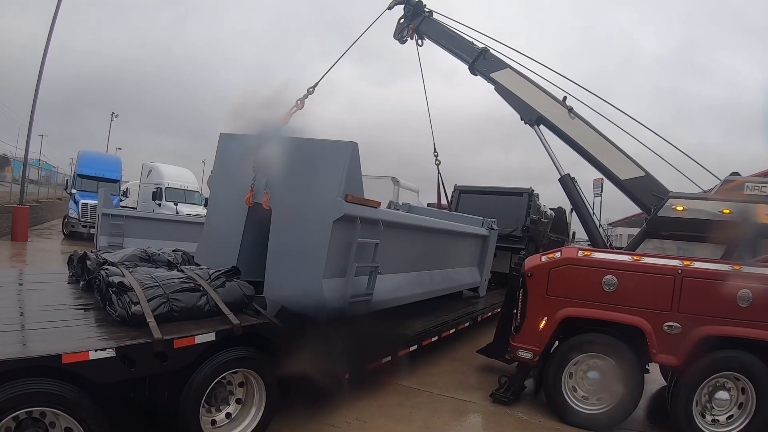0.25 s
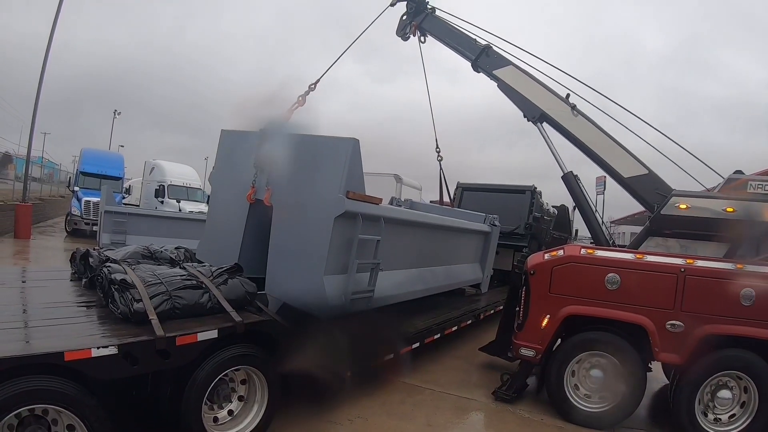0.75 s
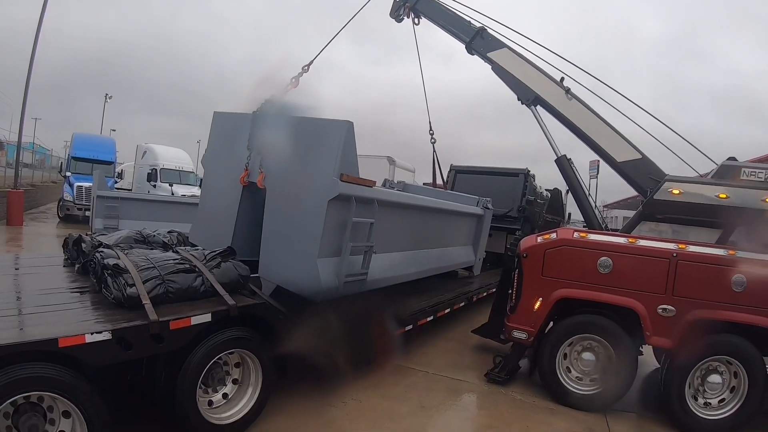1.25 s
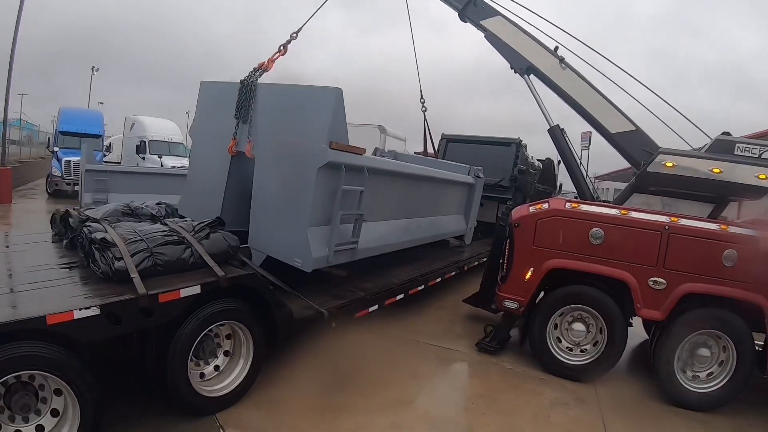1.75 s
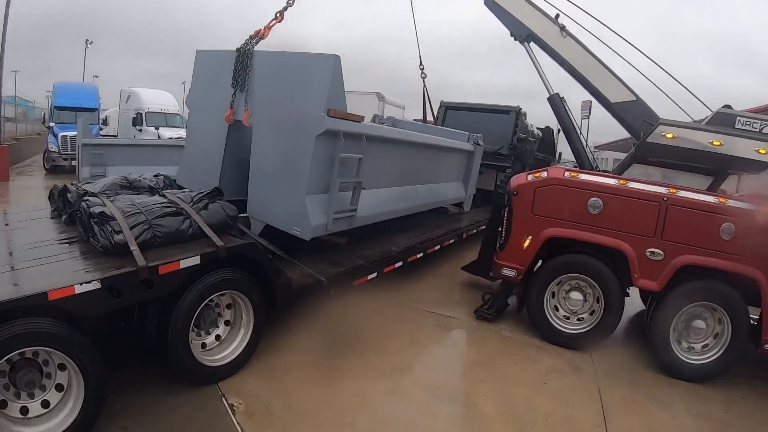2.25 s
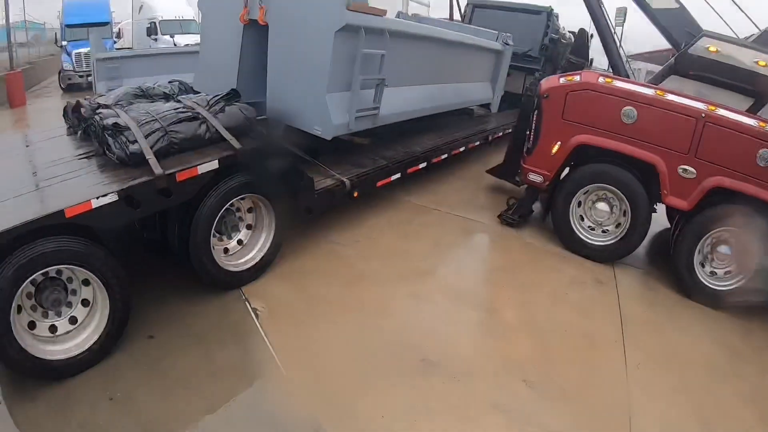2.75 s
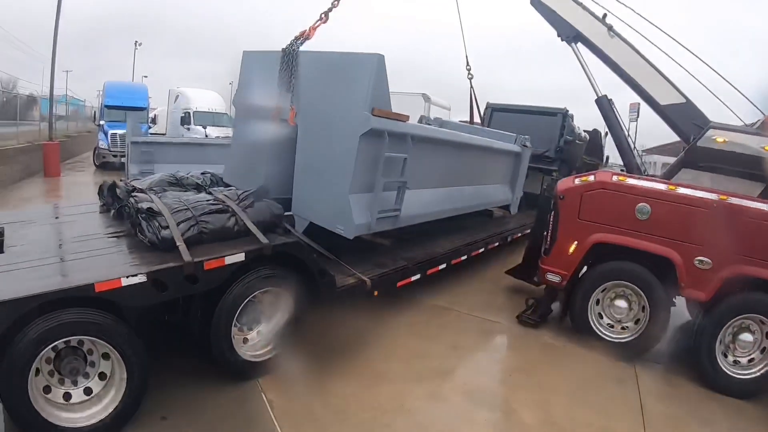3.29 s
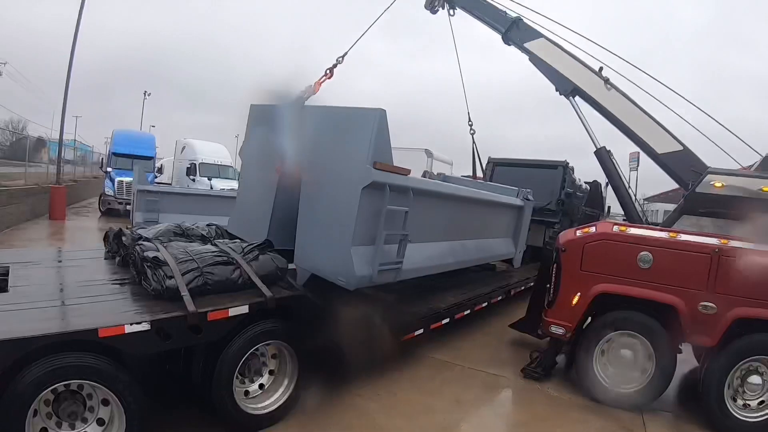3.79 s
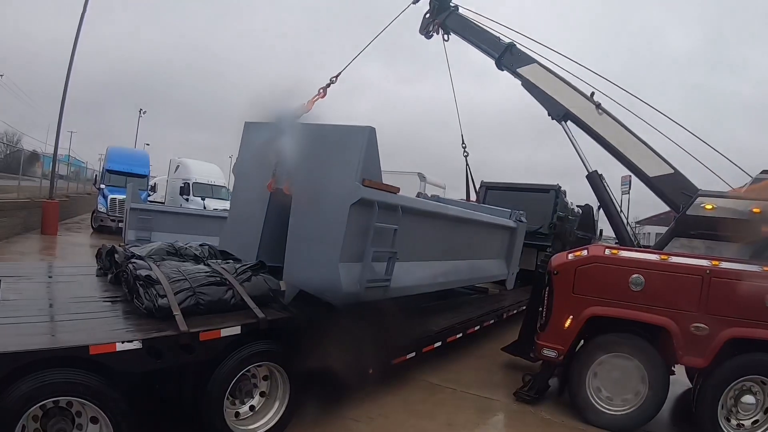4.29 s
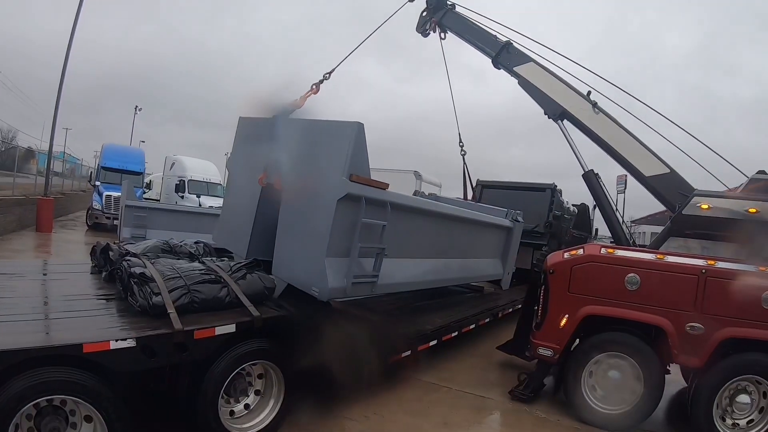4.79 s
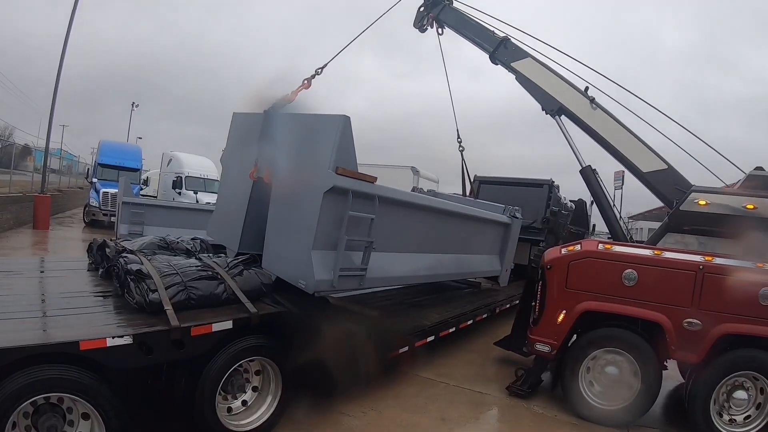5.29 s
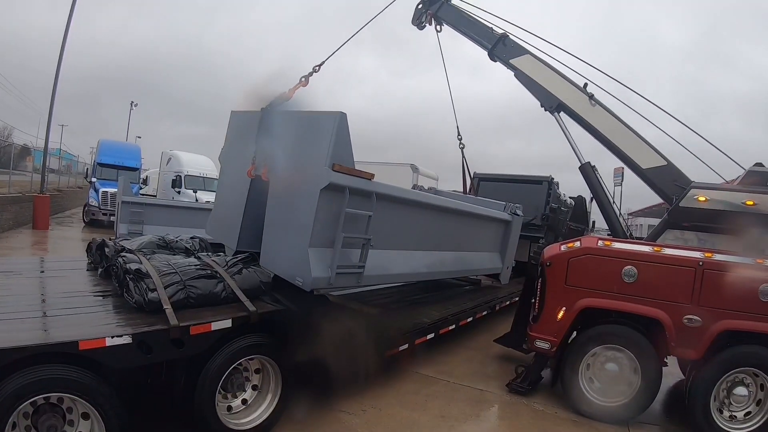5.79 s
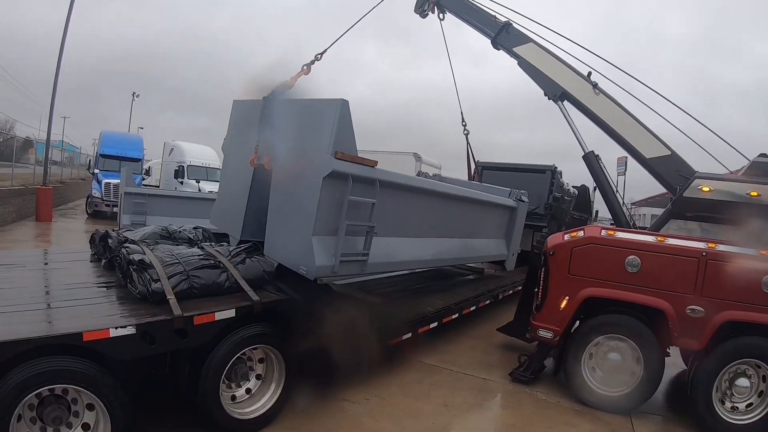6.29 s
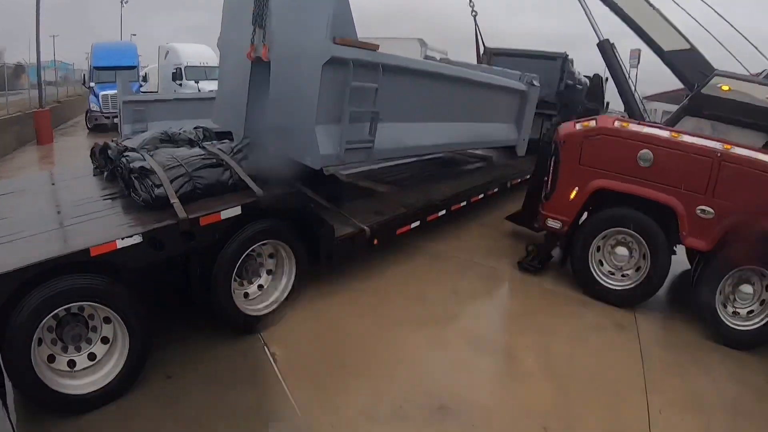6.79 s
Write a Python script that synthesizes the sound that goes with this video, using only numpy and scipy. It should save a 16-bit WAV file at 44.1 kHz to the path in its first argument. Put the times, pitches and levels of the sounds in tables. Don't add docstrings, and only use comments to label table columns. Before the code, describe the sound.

Heavy diesel trucks idle on a wet open lot, heard through a closed camera housing. A low throb, hollow exhaust drone, blurred clatter and fan hiss run throughout. Dull hand bumps come early, then a thin turbo whistle climbs, peaks and coasts down past the middle. Raindrops tick on the housing, and a cluster of stronger thumps arrives near the end.

```python
import sys
import numpy as np
from scipy import signal
from scipy.fft import rfft, irfft, next_fast_len
from scipy.io import wavfile
from scipy.ndimage import uniform_filter1d, map_coordinates

SR = 44100
rng = np.random.default_rng(int(sys.argv[2]) if len(sys.argv) > 2 else 0)


def wav_out(sig):
    wavfile.write(sys.argv[1], SR, np.round(np.clip(np.atleast_2d(sig).T, -1, 1) * 32767).astype(np.int16))


def boost_factor(decibels):
    exponent = np.asarray(decibels, float) / 20
    return 10 ** exponent


N = 310905
TIME_S = np.arange(N) / SR


def unit(x):
    return x / np.sqrt(np.mean(x ** 2) + 1e-20)


def curves(rows):
    s, *columns = np.transpose(rows)
    return [np.interp(TIME_S, s, column) for column in columns]


def wobble(rate):
    knots = rng.standard_normal(int(N * rate / SR) + 4)
    return map_coordinates(knots, [np.arange(N) * rate / SR])


def narrow_band(phase, width_hz):
    return wobble(width_hz) * np.sin(phase) + wobble(width_hz) * np.cos(phase)


def coloured(x, spectrum):
    size = next_fast_len(N + 8192)
    hz, db = np.transpose(spectrum)
    bins_hz = np.fft.rfftfreq(size, 1 / SR)
    gain_db = np.interp(np.log(bins_hz + 1), np.log(hz + 1), db)
    return unit(irfft(rfft(x, size) * boost_factor(gain_db), size)[:N])


def patchy(patchy_db):
    z = signal.stft(rng.standard_normal(N), nperseg=512)[2]
    field = uniform_filter1d(rng.standard_normal(z.shape), 5, 0)
    field = uniform_filter1d(field, 12, 1)
    return signal.istft(z * boost_factor(patchy_db * unit(field)), nperseg=512)[1][:N]


def add(track, s, sound):
    part = track[round(s * SR):][:len(sound)]
    part += sound[:len(part)]


def wind_filter():
    over_db, hold_s, release_s = -30, .55, .3
    cuts = []
    for s, db, *_ in BUMPS:
        if db > over_db:
            cuts.append((TIME_S > s) * np.clip(1 - (TIME_S - s - hold_s) / release_s, 0, 1))
    return uniform_filter1d(np.max(cuts, axis=0), SR // 20)


# pitch_hz, level_db (per Hz)
YARD = [(60, -60.5), (110, -5.5), (155, 2.5), (200, -4.5), (270, -4.5), (340, -42), (500, -92.5)]


def distant_traffic(duck):
    level_db = -57 - 1 * duck + 0.76 * wobble(4.9)
    return boost_factor(level_db) * coloured(patchy(1.0), YARD)


# centre_s, half_width_s, level_db
FAR_SWELLS = [
    (.85, .3, -92),
    (6.65, .4, -92),
]


def far_turbo():
    level = sum(boost_factor(top_db + 3 - 6 * ((TIME_S - s) / half) ** 2) for s, half, top_db in FAR_SWELLS)
    return level * np.sin(2 * np.pi * np.cumsum(5615 + 5 * wobble(30)) / SR)


# pitch_hz, width_hz, level_db
HUMS = [(432.7, 33, -54.5), (751, 22, -66.5), (529, 20, -64), (1203, 25, -66.5), (1663, 25, -60.5),
        (2205, 32, -66.5)]


def hums():
    return sum(boost_factor(db) * narrow_band(2 * np.pi * hz * TIME_S, width) for hz, width, db in HUMS)


# start_s, effort_db
LOAD = [(0, -0.5), (.5, 0), (2.9, 0), (3.4, 1.4), (4.5, 1), (5.4, 0), (6.5, 1.2), (6.75, 0.6), (7.05, -1.5)]


def effort():
    return curves(LOAD)[0]


# pitch_hz, level_db (per Hz)
HISS = [(3000, -40), (3700, 5), (4000, 0.0), (4500, -4.5), (5050, -8.8), (5450, -3.1), (5850, -2.9),
        (6300, -8.6), (7000, -12.2), (8200, -17.6), (9800, -18.5), (10400, -32), (11000, -41), (11700, -41),
        (12300, -26)]


def fan_hiss(effort_db):
    level_db = -74.5 + 1.4 * effort_db + .5 * wobble(9)
    return boost_factor(level_db) * coloured(patchy(.4), HISS)


# start_s, pitch_hz, level_db
TURBO = [(0, 5430, -91), (.45, 5400, -90), (1, 5402, -93), (2.3, 5350, -96), (2.6, 5372, -80),
         (2.95, 5366, -91), (3.75, 5410, -88), (4.17, 5440, -85), (4.36, 5820, -73), (4.44, 6240, -89),
         (4.57, 6405, -85), (4.8, 6290, -77), (5.13, 6285, -82), (5.42, 5950, -72), (5.85, 5592, -76),
         (6.15, 5425, -86), (6.45, 5393, -94), (7.05, 5458, -82)]


def turbo():
    hz, db = uniform_filter1d(curves(TURBO), SR // 16)
    duct_hz, duct_width_hz, duct_db = 5600, 35, 12
    db = db + duct_db / (1 + ((hz - duct_hz) / duct_width_hz) ** 2)
    hz_per_s = abs(np.gradient(hz)) * SR
    glide = np.clip(uniform_filter1d(hz_per_s / 1500, SR // 10), 0, 1)
    phase = 2 * np.pi * np.cumsum(hz + 4 * wobble(40)) / SR
    blur = glide * narrow_band(phase, 150)
    octave = boost_factor(-27) * np.clip((hz - 6150) / 100, 0, 1) * np.sin(2 * phase)
    level_db = db + 4.5 + 1.5 * wobble(30) + 1.5 * wobble(8)
    return boost_factor(level_db) * ((1 - .5 * glide) * np.sin(phase) + .7 * blur + octave)


# start_s, peak_db, pitch_hz, upper_mode_db, swell_s
PLOPS = [(0.1064, -43, 1670, -53.5, 0.00047), (1.7043, -41, 1780, -48, 0.00066),
         (1.7385, -32, 1650, -56, 0.00097), (1.9828, -46, 1710, -51, 0.00068),
         (2.781, -38, 1580, -53, 0.00085), (5.1483, -37, 1690, -51, 0.0005),
         (5.2515, -53, 1656, -59, 0.0006), (5.3106, -42, 1860, -42.5, 0.0007),
         (5.7683, -40, 1750, -44, 0.00081), (6.214, -37.5, 1750, -43.5, 0.00056),
         (6.627, -29.5, 1150, -52.5, 0.00031), (6.631, -35.5, 1800, -53, 0.00033),
         (6.643, -41.5, 1750, -54, .0006)]
# start_s, peak_db, pitch_hz, splash_db
TICKS = [(.105, -60, 4080, -17), (1.5628, -57, 4000, -8), (1.7045, -46.5, 4330, -17),
         (1.763, -67, 4140, -32), (2.776, -53, 4100, -23), (3.0574, -61, 4220, -9),
         (3.8212, -60, 3800, -10), (4.2882, -52, 3920, -28), (4.2936, -49, 3540, -23),
         (5.1464, -71, 4340, -17), (5.679, -52, 4200, -15), (5.7667, -63, 4070, -24),
         (5.8424, -60, 3910, -10), (6.2138, -64, 4270, -28), (6.6144, -64, 3830, -16),
         (6.6228, -57.5, 3890, -22), (6.6566, -59, 4090, -21)]


def drops():
    out, t = np.zeros(N), np.arange(SR // 30) / SR

    def ring(db, hz, swell_s):
        return boost_factor(db) * t / swell_s * np.exp(1 - t / swell_s) * np.sin(2 * np.pi * hz * t)

    splash_band = signal.butter(5, [5800, 8600], "bandpass", fs=SR, output="sos")
    for s, db, hz, upper_db, swell_s in PLOPS:
        add(out, s + .0006, ring(db + 4.5, hz, swell_s) + ring(upper_db + 9, 2640, 0.00051))
    for s, db, hz, splash_db in TICKS:
        puff = signal.sosfilt(splash_band, boost_factor(-60 * t / .0055) * rng.standard_normal(len(t)))
        add(out, s + .0008, ring(db + 3, hz, 0.00044) + boost_factor(db + splash_db + 14) * puff)
    return out


# start_s, peak_db, pitch_hz, length_s, hold (1-6, higher fades later)
BUMPS = [(1.5358, -13.3, 106, .037, 2), (1.9462, -29, 84, .026, 3), (2.381, -18.5, 104, .04, 2.2),
         (1.571, -33, 100, .035, 2), (2.419, -35, 100, .04, 2), (2.612, -37, 100, .03, 2),
         (3.966, -38, 85, .04, 2), (4.2217, -25, 102, .036, 1.6), (6.6085, -12.8, 110, .0255, 6),
         (6.6345, -16, 102, .019, 3), (6.647, -25, 72, .047, 4), (6.6915, -21, 76, .047, 6),
         (6.898, -28, 100, .04, 2), (6.976, -29, 105, .045, 2.5)]


def bumps():
    out, t = np.zeros(N), np.arange(SR // 12) / SR
    for s, db, hz, length, hold in BUMPS:
        u = np.clip(t / length, 0, 1)
        swell = np.minimum(t * hz / .7, 1) ** 1.5 * (1 - u ** hold) ** 2
        stiffer_mode = boost_factor(-13.5) * (1 - u) * np.sin(2 * np.pi * 1.973 * hz * t)
        swing = np.sin(2 * np.pi * hz * t) + stiffer_mode
        skin_rub = boost_factor(db - 63) * swell * rng.standard_normal(len(t))
        add(out, s, skin_rub - boost_factor(db) * swell * swing)
    return out


# start_s, level_db, pitch_ratio (by where it is held)
KNOCKS = [(1.5358, -32, 0.98), (1.94, -40, 1.17), (2.381, -34, 0.99), (4.2217, -48, 1), (5.5232, -36, 1.2),
          (6.603, -25.5, 1.01), (6.6285, -24, 0.963), (6.898, -46, 0.94), (6.976, -48, 1.05)]
# pitch_hz, level_db, t60_s
SHELL = [(585, 0, .05), (760, -9, .03), (290, -4, .04)]


def shell_knocks():
    out, t = np.zeros(N), np.arange(SR // 12) / SR
    for s, db, ratio in KNOCKS:
        knock = sum(boost_factor(level - 60 * t / t60) * np.sin(2 * np.pi * ratio * hz * t) for hz, level, t60 in SHELL)
        add(out, s, boost_factor(db) * knock * np.minimum(t / .006, 1))
    return out


# (multiple, level_db)
TRUCKS = [
    (35.1, [(1, 0), (2, -7), (3, -22)]),
    (36.1, [(1, -8), (2, -11), (3, -24)]),
    (40.1, [(1, -6), (1.5, -18), (2, -15), (3, -23), (4, -25)]),
    (48.8, [(1, -9), (3, -26)]),
]


def firing():
    orders, knocks = np.zeros(N), np.zeros(N)
    for hz, multiples in TRUCKS:
        phase = 2 * np.pi * np.cumsum(hz * (1 + 0.0051 * wobble(1.494))) / SR
        for k, db in multiples:
            orders += boost_factor(db + 1.2 * wobble(3)) * np.sin(k * phase + rng.uniform(0, 7))
        knocks += boost_factor(1.1 * np.cos(phase))
    return orders, knocks


# pitch_hz, level_db (per Hz)
CLATTER = [(850, -26), (1130, -7.5), (1200, -2), (1300, -2.5), (1550, -1.0), (1700, 4), (1900, 3),
           (2080, -5.5), (2200, -4.5), (2450, -11.5), (2700, -14), (3200, -9.5), (3600, -18.0),
           (4700, -90.5)]


def clatter(knocks, effort_db):
    level_db = -50 + effort_db + 0.34 * wobble(6)
    return boost_factor(level_db) * coloured(knocks * patchy(0.92), CLATTER)


# pitch_hz, level_db (per Hz)
DRONE = [(140, -49.5), (230, -22.5), (344, -5), (391, -3.5), (423, 0), (445, -4.5), (490, -19),
         (523, -20.5), (656, -26), (696, -28.5), (752, -22), (812, -31), (878, -24), (986, -31.5),
         (1080, -34.5), (1400, -62), (2380, -120)]


def exhaust_drone(effort_db):
    level_db = -43.5 + effort_db + .8 * wobble(3)
    return boost_factor(level_db) * coloured(patchy(.4), DRONE)


# start_s, exhaust_db
IDLE = [(0, -3), (.2, 3), (.7, -4.5), (1.1, 0), (1.5, 1), (3.2, 0), (3.65, -7.5), (3.9, -4.5), (5.0, 3),
        (5.3, -0.5), (6.15, -5), (6.55, -2), (7.05, 3.5)]
# pitch_hz, level_db (per Hz)
RUMBLE = [(6, -30), (12, -12), (25, -1), (60, -3), (90, -5), (125, -13), (200, -30), (300, -90)]


def bass(orders, duck):
    idle_db = curves(IDLE)[0]
    orders_db = -42 + idle_db - 8.5 * duck
    rumble_db = -50 + 0.25 * idle_db - 8 * duck + 2.9 * wobble(4)
    return boost_factor(orders_db) * orders + boost_factor(rumble_db) * coloured(patchy(0.0), RUMBLE)


def trucks():
    duck, effort_db = wind_filter(), effort()
    orders, knocks = firing()
    engines = bass(orders, duck) + exhaust_drone(effort_db) + clatter(knocks, effort_db)
    return distant_traffic(duck) + fan_hiss(effort_db) + engines


def late_dip(x):
    starts_s, band_hz, share = 6.66, (500, 1050), .35
    band = signal.sosfiltfilt(signal.butter(2, band_hz, "bandpass", fs=SR, output="sos"), x)
    return x - share * (TIME_S > starts_s) * band


def scene():
    through_panel = late_dip(trucks() + hums())
    handling = bumps() + shell_knocks()
    return (through_panel + far_turbo() + turbo() + drops() + handling)[None]


def band_limit(x):
    return signal.sosfilt(signal.butter(12, 13630, fs=SR, output="sos"), x)


def record(dry):
    return band_limit(dry)


dry = scene()
out = record(dry)
wav_out(out)
```